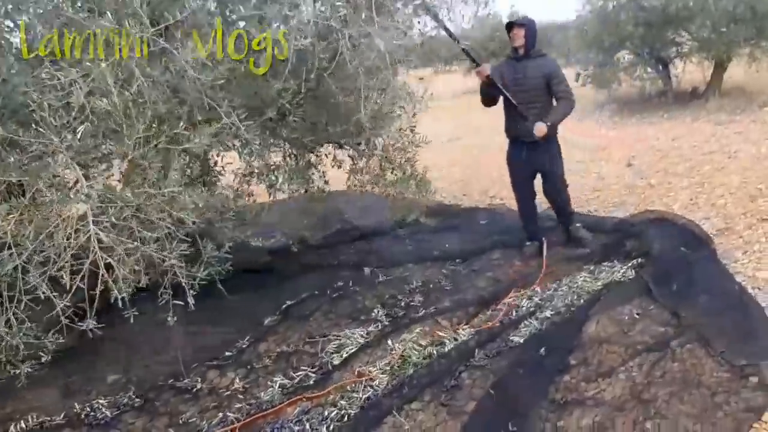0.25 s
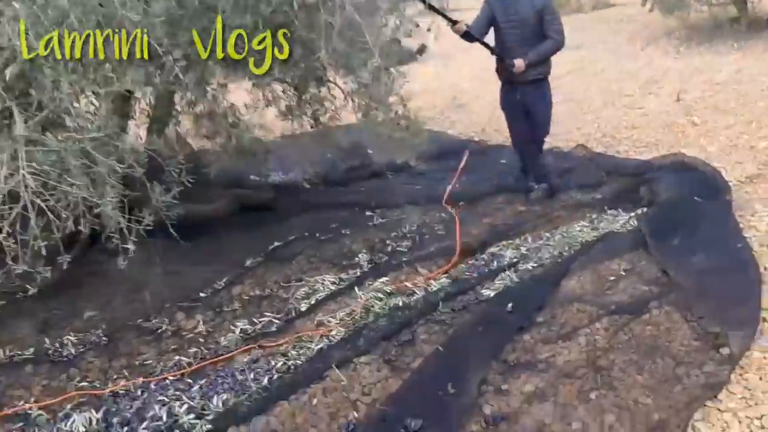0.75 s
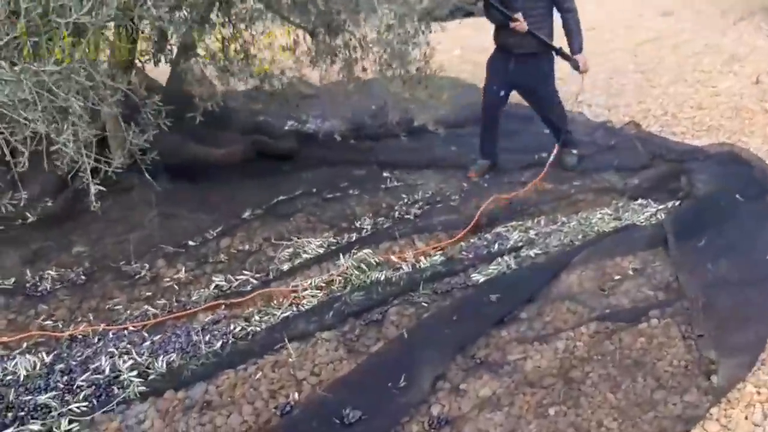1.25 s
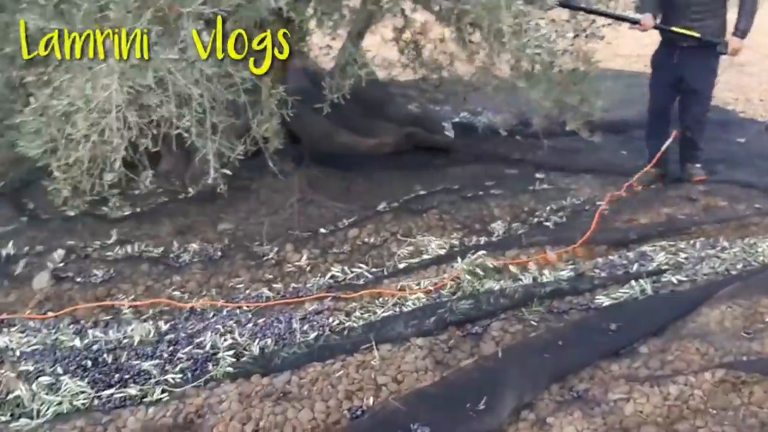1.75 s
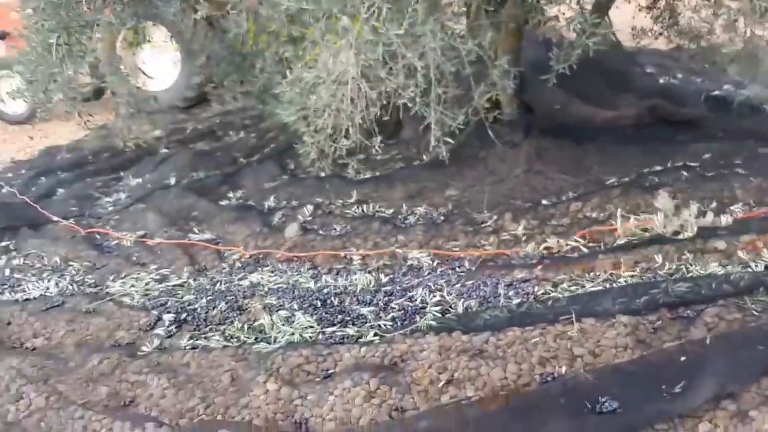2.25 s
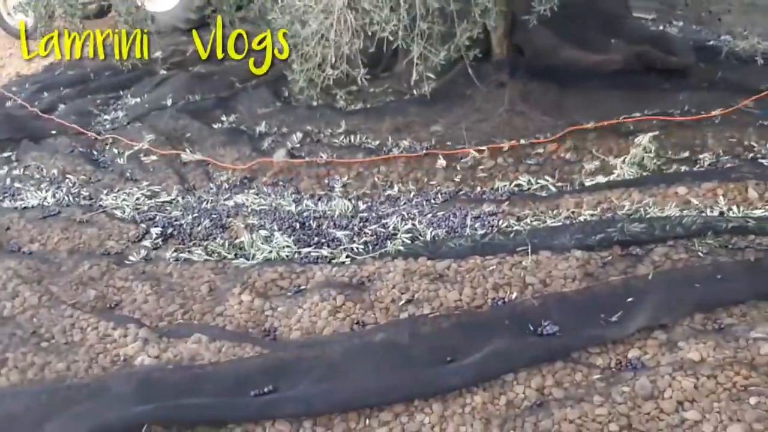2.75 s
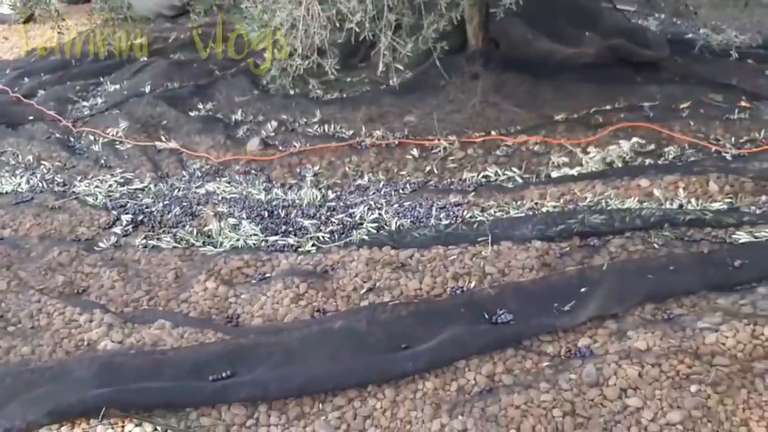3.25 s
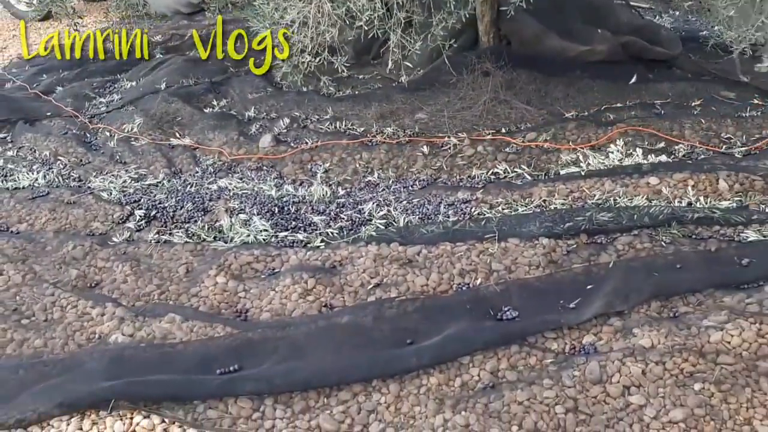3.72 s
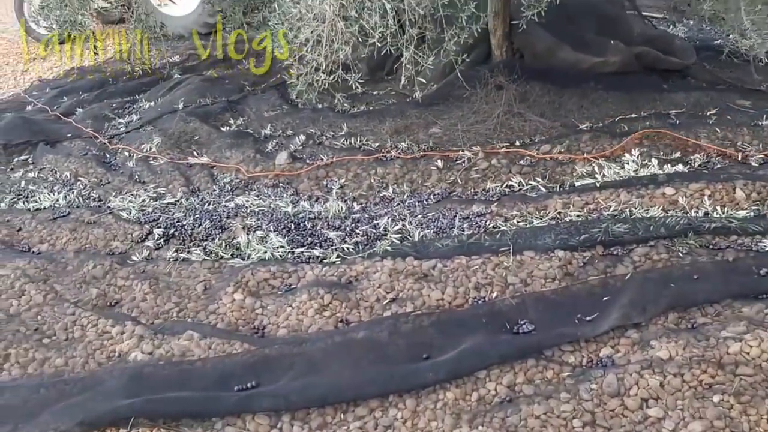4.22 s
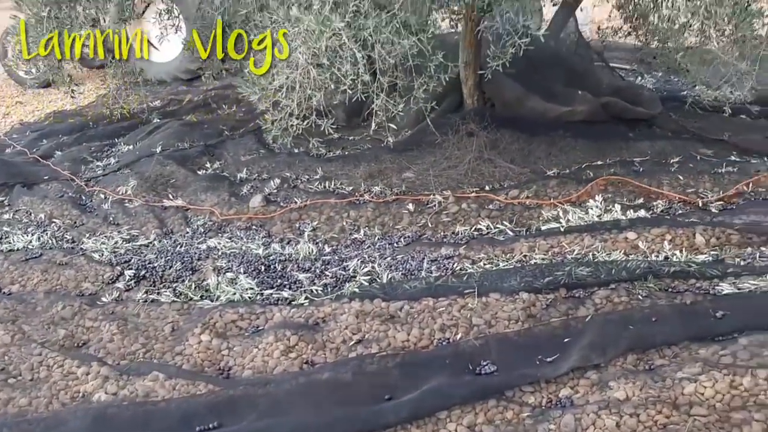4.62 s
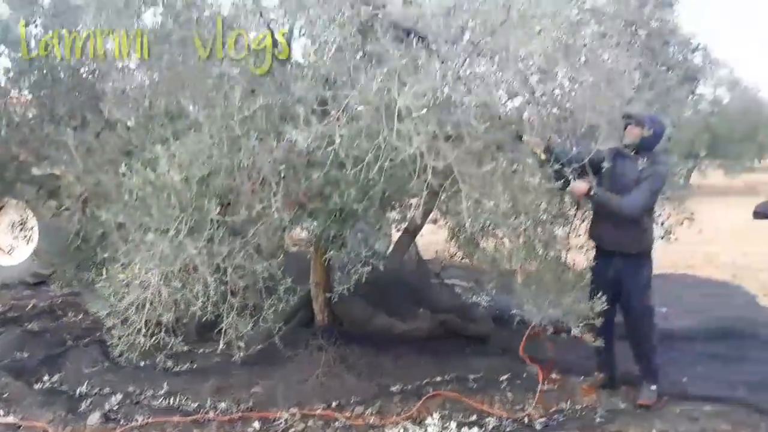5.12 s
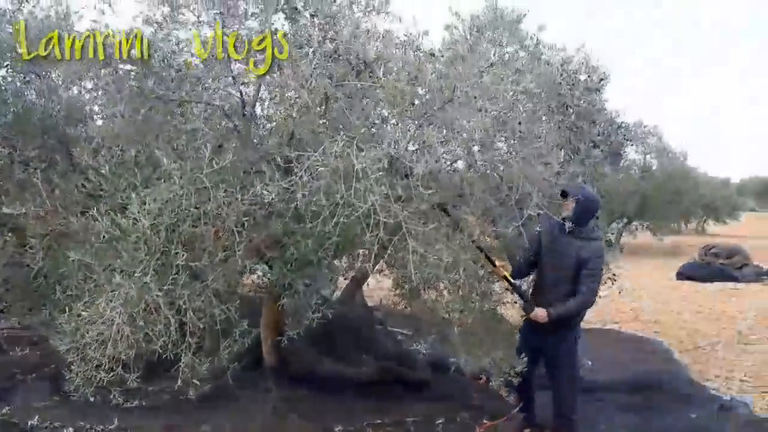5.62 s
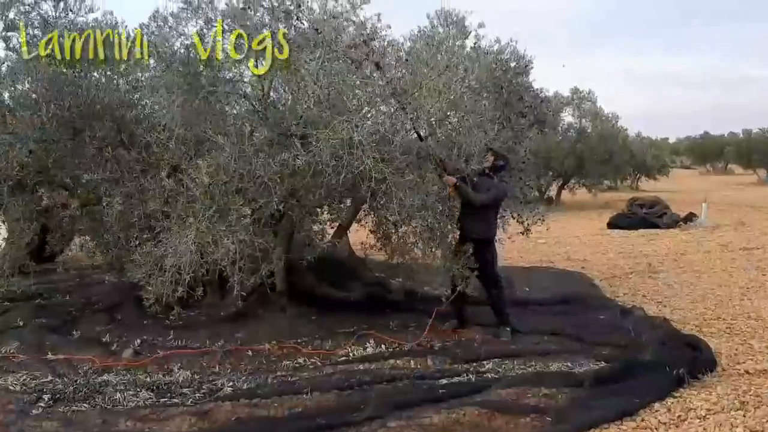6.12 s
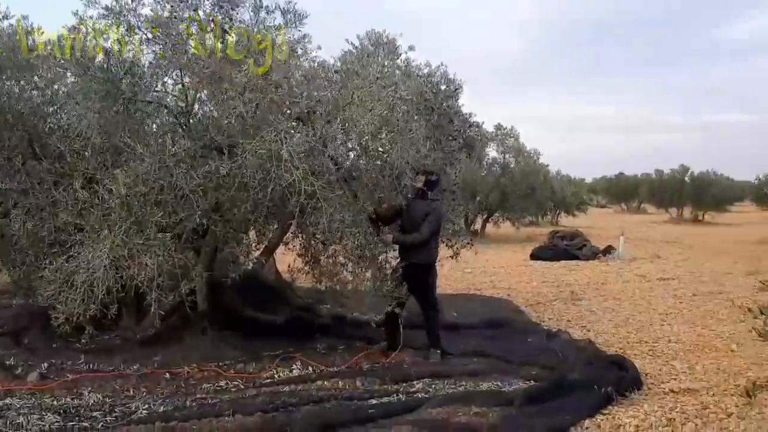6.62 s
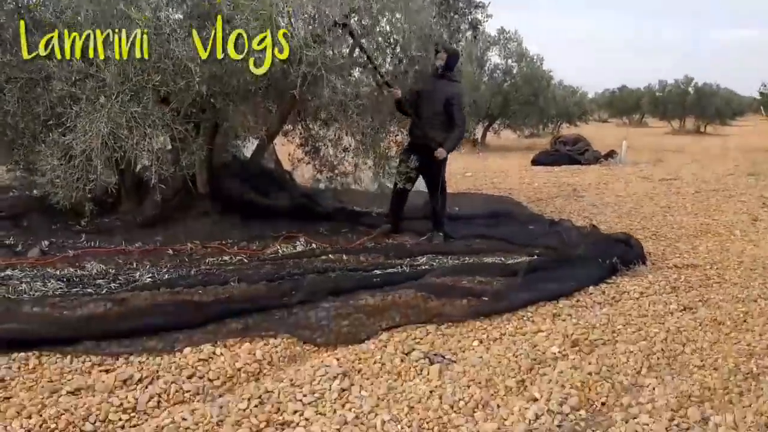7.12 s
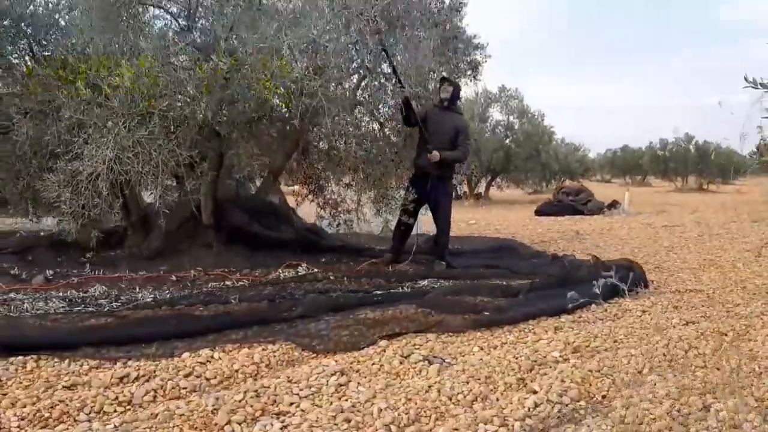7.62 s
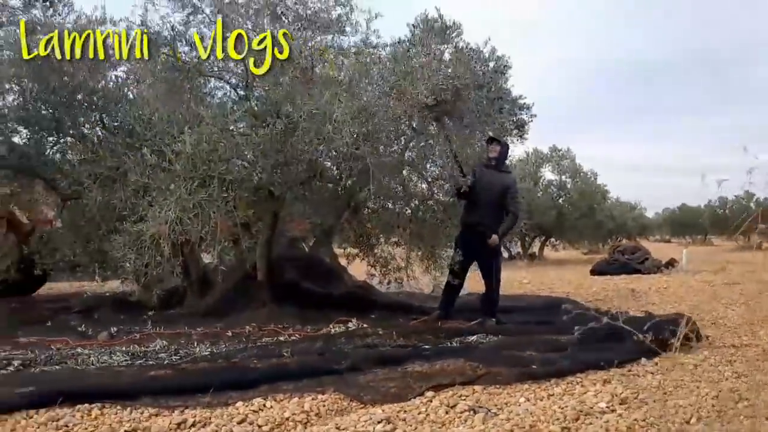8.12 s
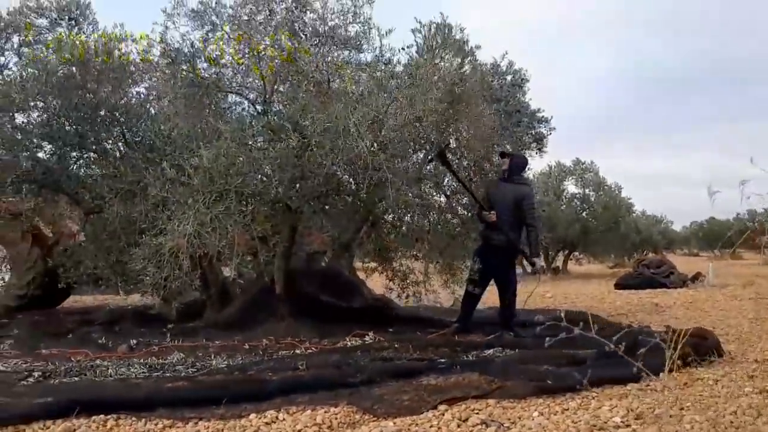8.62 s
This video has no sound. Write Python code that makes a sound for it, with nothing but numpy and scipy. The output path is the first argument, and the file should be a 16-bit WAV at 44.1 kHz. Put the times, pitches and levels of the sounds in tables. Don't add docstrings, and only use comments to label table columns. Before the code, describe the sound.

Outdoors in an open orchard, close handheld phone pickup: steady fast knocking of a motorized harvesting rake, high gear whine bending under load, leaf hiss surging with each pass. Plastic tines clack, tick and slide off twigs, strongest near two seconds. Low wind thumps cover the end of the first section; after a momentary fade the same rattle and rustle continue more quietly at a distance.

```python
import sys
import numpy as np
from scipy import signal
from scipy.io import wavfile
from scipy.ndimage import uniform_filter1d, map_coordinates

SR = 44100
rng = np.random.default_rng(int(sys.argv[2]) if len(sys.argv) > 2 else 0)


def volts_from_decibels(level):
    exponent = np.asarray(level, float) / 20
    return 10 ** exponent


def wav_out(sig):
    wavfile.write(sys.argv[1], SR, np.round(np.clip(np.atleast_2d(sig).T, -1, 1) * 32767).astype(np.int16))


N = 390726
TIME = np.arange(N) / SR
COARSE = TIME[::64]

# (time [s], gear head level [dB], open-view brightness [dB], gear mesh level [dB])
RAKE = [(0, -48, 0, -64), (.67, -48.5, 4.5, -62), (1.08, -46.5, -0.5, -79), (2.04, -44.5, 3, -49),
        (2.6, -50, 3, -57), (2.94, -52, 0, -62.5), (3.5, -47.5, 3.5, -51), (4.13, -45.5, 0.5, -60.5),
        (4.54, -45, -2.5, -49.5), (4.82, -45.5, 1.5, -49.5), (5.2, -45.5, 7, -53), (5.56, -48, 0, -55.5),
        (5.9, -46, -1.5, -46.5), (5.93, -62, -3, -69), (6.48, -52.5, 1.5, -69), (7.2, -57, 1, -70.5),
        (7.92, -55, 2, -89), (8.5, -58.5, 3, -63)]
# (time [s], speed [strokes/s])
SPEED = [(0, 33.34), (.8, 34.58), (1.2, 33.35), (1.8, 29.32), (2.4, 32.73), (3.0, 33.73), (3.6, 31.45),
         (4.0, 34.01), (4.8, 32.45), (5.4, 34.5), (6.2, 32.8), (6.4, 30.15), (6.6, 32.2), (7.0, 33.74),
         (7.8, 31.85), (8.0, 30.2), (8.2, 33.23)]
FIRST_STROKE = -.4
# (place [strokes], level [dB])
SWING = [
    (0.199, -5.5),
    (0.417, -8),
    (0.866, 0.5),
    (1.202, -11),
    (1.465, -6.5),
    (1.901, 0),
]
# (frequency [Hz], density [dB per Hz])
HOUSING = [(250, -38), (450, -9.5), (600, -12), (800, -4.5), (1200, -0.5), (1900, -4.5), (2400, -0.5),
           (3300, -5.5), (4500, -5), (6500, -15), (8000, -24.5), (16000, -66.5)]
CRANK_DB, CRANK_T60 = -5, .012
# (share of mesh frequency [ratio], width [Hz], level over the gear head [dB])
MOTOR = [(.131, 28, -18.5), (.265, 40, -13.5), (.53, 150, -16)]
# (deepest time [s], half length [s], sag [Hz])
LOADS = [(0.8, 0.36, 355.3), (1.155, .3, 102), (2.048, 0.35, 495.6), (2.422, 0.24, 478.3),
         (2.841, 0.2, 80.2), (3.0, 0.92, 80.2), (3.085, 0.21, 89.5), (3.501, 0.14, 120.5),
         (3.746, 0.31, 482), (4.107, 0.29, 60.65), (5.101, .3, 399.4), (5.379, 0.25, 422),
         (5.773, 0.27, 44.2), (6.559, 0.51, 382.4), (7.292, 0.41, 49.73), (8.041, 0.61, 442.7),
         (8.699, .5, 261)]
FREE_HZ = 4606
MESH_LOSS_DB_PER_KHZ = 20
WOBBLE, JITTER, FLUTTER_DB = .0065, .004, 3.2
# (peak time [s], rise [s], fall [s], leaf level [dB], limb level [dB])
PASSES = [(.03, 0.12, 0.33, -46, -65), (.39, 0.037, 0.12, -37, -46.5), (1.08, 0.75, 0.32, -38, -49),
          (1.62, 0.15, 1, -36, -49.5), (2.04, 0.23, 0.35, -36.5, -53), (2.499, 0.33, 0.12, -59, -61),
          (2.86, 0.18, 0.27, -41.5, -57.5), (3.2, 0.94, 0.37, -60, -86), (3.66, 0.66, 1, -39.5, -54),
          (4.54, 0.24, 0.56, -51, -61), (5.0, 0.95, 0.17, -44.5, -60), (5.35, 0.63, 0.66, -44, -54.5),
          (5.849, 0.11, .05, -50, -60), (6.48, 0.48, 0.5, -49, -64), (6.85, 0.74, 0.25, -48.5, -70),
          (7.6, 0.24, .05, -81, -67), (7.92, 0.55, 0.71, -48, -56.5), (8.55, 0.72, 1, -51.5, -63.5),
          (8.87, 0.055, 0.066, -39, -86)]
PASS_DROP_DB, LIMB_DROP_DB = 14.5, 19
LEAF_REST_DB, LIMB_REST_DB, FIZZ_DB = -5, -25, -9
FIZZ_SHARE = 0.8
# (frequency [Hz], density [dB per Hz])
LEAVES = [(800, -27), (2000, -12.5), (3700, 0), (5000, -4), (6000, 2), (6900, -5.5), (8000, -20.5),
          (10000, -29.5)]
# (frequency [Hz], density [dB per Hz])
FIZZ = [(6500, -24.5), (8200, -2.5), (10000, 3.5), (12500, 4.5), (15300, 3), (16500, -1)]
# (frequency [Hz], density [dB per Hz])
LIMBS = [(120, -22.5), (230, -14.5), (350, 1.5), (520, 2), (800, -5.5), (1500, -41)]
# (time [s], peak [dB], top band over the peak [dB])
CLACKS = [(0.818, -20, -11.5), (0.9573, -18.5, -15), (1.076, -21, -10), (1.0958, -15, -25),
          (1.132, -19.5, -11), (1.1945, -17, -10), (1.3449, -25, -23), (1.9235, -22, -12),
          (1.991, -12, -21), (2.0332, -8.5, 2.5), (2.072, -13, -21), (2.0971, -12, -6), (2.1015, -15, -18),
          (2.1316, -8.5, -11.5), (2.1364, -16, -22), (3.5505, -26, -7), (3.628, -21, -12),
          (3.84, -19.5, -9), (6.5253, -21, -10.5), (6.813, -27, -4.5), (7.8565, -20.5, -10)]
CLACK_HZ, CLACK_T60 = 5890, 0.038
# (time [s], peak [dB], ring [Hz])
TWIGS = [(0.101, -29, 2980), (0.160, -26, 3970), (0.2469, -24.5, 3700), (0.2736, -27, 2550),
         (0.5125, -22.5, 4570), (0.6594, -26, 4030), (0.73, -26.5, 4570), (1.4925, -26.5, 3430),
         (1.55, -21.5, 3520), (1.61, -19, 2540), (2.164, -23, 4050), (2.372, -22.5, 3810),
         (3.3105, -23, 3540), (3.93, -28, 4167), (4.0527, -25, 3540), (4.1686, -29, 3770),
         (4.229, -30, 4420), (4.609, -23, 4740), (5.3028, -16, 3140), (5.3681, -12.5, 3646),
         (5.69, -32, 4050), (5.806, -30, 4285), (6.4874, -33, 2778), (6.9126, -26, 4360),
         (7.804, -27, 3740), (7.9841, -26.5, 3620)]
TWIG_TOP_DB, TWIG_T60 = -19.5, 0.056
# (time [s], peak [dB], ring [Hz])
TICKS = [(0.0403, -35, 2530), (0.1884, -25, 5100), (0.2179, -22, 3090), (0.2364, -20, 3720),
         (0.3047, -30, 4600), (0.3341, -31, 2770), (0.4514, -37, 4610), (0.7854, -24, 4220),
         (0.9423, -26, 4460), (1.0241, -14, 5250), (1.3139, -26, 3000), (1.3763, -28, 3160),
         (1.724, -13, 4460), (2.0584, -21, 5890), (2.587, -33, 3410), (2.6509, -28, 3170),
         (2.7117, -26.5, 3800), (3.0135, -42, 4530), (3.0784, -27, 4090), (3.1343, -37, 4400),
         (3.1936, -34, 4480), (3.3812, -19, 3780), (3.4326, -27, 4400), (3.4625, -33, 3610),
         (3.5773, -25, 4550), (3.9918, -22.5, 4100), (4.1101, -23, 3980), (4.14, -28.5, 3360),
         (4.4653, -29, 4460), (4.5211, -28, 4700), (5.2759, -21.5, 2800), (5.6314, -39, 4550),
         (6.0057, -45, 4490), (6.0362, -51, 4590), (6.0955, -34, 2990), (6.1539, -37, 3020),
         (6.2108, -29, 3530), (6.3026, -24.5, 2850), (6.3669, -35, 3960), (6.4338, -29, 2500),
         (6.6934, -28, 3700), (6.7441, -29, 6470), (6.8523, -21, 4020), (6.998, -31, 4570),
         (7.1756, -39, 4720), (7.3347, -33, 3040), (7.6525, -46, 4460), (7.7348, -31, 5820),
         (7.888, -31, 5400), (7.9264, -42, 5300), (7.9538, -30, 5340), (8.2157, -35, 5680),
         (8.2621, -29, 4200), (8.3115, -34, 3520), (8.3464, -31, 4390), (8.6453, -28, 4720),
         (8.737, -31, 5570), (8.7984, -28, 6000), (8.8448, -25.5, 6610)]
TICK_TOP_DB, TICK_T60 = -17.5, 0.024
# (time [s], peak [dB], ring [Hz], decay T60 [s])
SLIDES = [
    (.376, -20.5, 4800, 0.15),
    (0.482, -31, 4550, 0.15),
    (0.752, -25.5, 4330, 0.055),
    (1.953, -15.5, 5580, .13),
    (3.733, -20.5, 5550, 0.12),
    (8.05, -24.5, 3680, 0.11),
]
SLIDE_TOP_DB = -13.5
SNAP_T60 = .06
RING_DB, UNDERTONE, UNDERTONE_DB = 1, .635, -5
# (time [s], peak [dB], ring [Hz])
THUDS = [(0.376, -44, 222), (0.939, -34, 356), (1.08, -32, 476), (1.599, -56, 550), (1.949, -33.5, 540),
         (2.172, -33.5, 488), (2.409, -40, 397), (2.787, -45, 580), (3.385, -43, 585), (3.629, -52, 580),
         (3.833, -35.5, 483), (7.814, -48, 590)]
# (peak time [s], rise [s], fall [s], level [dB])
GUSTS = [(0, .1, 0.14, -43), (.39, 0.32, 0.13, -60), (.6, 0.21, 0.077, -50), (1.0, 1.2, .4, -62.5),
         (1.58, 0.11, .6, -64), (2.21, 0.062, 0.13, -58), (2.47, 0.11, 0.11, -62), (2.82, .12, 0.084, -66),
         (3.76, .85, .38, -75), (5.0, 0.13, 0.26, -56), (5.2, 0.11, 0.2, -37), (5.48, 0.036, 0.056, -34),
         (5.63, 0.34, 0.31, -41), (5.8, 0.14, 0.19, -35), (6.11, 0.057, 0.026, -58),
         (6.98, 0.095, 0.2, -56), (7.35, 0.049, 0.037, -54), (7.61, 0.15, 0.31, -57), (8.3, 2, 0.88, -63.5),
         (8.61, 0.18, 0.23, -51.5), (8.83, 0.091, 0.028, -58), (4.9, 1.3, 0.21, -65)]
GUST_DROP_DB, CALM_DB = 23.5, -83.5
# (frequency [Hz], density [dB per Hz])
GUST = [(15, -34), (25, -82), (65, 0), (141, -1.5), (257, -8.5), (308, -16.5), (395, -13.5), (430, -18),
        (700, -45), (910, -37), (1540, -120)]
PORT_WIND_DB = [
    [0],
    [2],
]
# (time [s], peak [dB], frequency [Hz], left minus right [dB])
PUFFS = [(0.589, -43, 152.4, 0), (4.993, -45, 104, -14), (5.2, -39, 230, 2), (5.467, -31, 144, 13),
         (5.55, -34.5, 143.7, -3), (5.679, -40, 87, -6), (5.787, -40, 121.6, -1.5), (5.849, -36.5, 252, -3),
         (6.971, -61, 91.2, -5), (7.335, -55.5, 131, 5), (7.613, -49, 142, 11)]
# (time [s], delay [ms])
GROUND = [(0, 1.64), (1.3, 1.7), (3.3, 1.81), (4.2, 1.73), (5, 1.89), (5.5, 2.1), (5.9, 2.07), (5.95, 3.5),
          (6.2, 4.24), (6.8, 2.85), (7.4, 1.97), (7.6, 1.77), (8, 1.57), (8.6, 1.83)]
NET_MS, NET_DB, SOIL_DB = 1.29, -18, -13.5
# (time [s], delay [ms])
LATE = [(0.1, 0.051), (1.1, -0.0071), (1.9, 0.12), (2.3, 0.28), (3.7, 0.17), (4.1, 0.26), (4.7, 0.17),
        (5.1, -0.049), (6.1, -0.048), (6.7, -0.11), (7.1, -0.052), (8.7, 0.043)]
# (frequency [Hz], share [ratio])
DIRECT = [(200, .92), (500, .97), (1300, .84), (3000, .66), (5500, .55), (9000, .3), (14000, .25)]
# (frequency [Hz], left minus right [dB])
TILT = [(60, 11), (180, 0.5), (550, -1.5), (1650, 1.5), (4970, -2.5), (15000, 1)]
EDGE_HZ = 15550
CUT_S, FADE_OUT_S, FADE_IN_S, FADE_POWER = 5.917, .05, .062, 2.5
SILENT_S = .006


def stroke_count():
    s, per_s = np.transpose(SPEED)
    speed = per_s[np.searchsorted(s, TIME, "right") - 1]
    return FIRST_STROKE + np.cumsum(speed) / SR


def knocks(loose=.03, spread_db=1.6):
    count, train = stroke_count(), np.zeros(N)
    swings = np.arange(0, count[-1] - 2, 2)
    for place, db in SWING:
        chance = rng.standard_normal((len(swings), 2))
        at = np.searchsorted(count, swings + place + loose * chance[:, 0])
        train[np.clip(at, 0, N - 1)] += volts_from_decibels(db + spread_db * chance[:, 1])
    return train


def gear_head(train):
    grind = grains(1500, 1.0, 0.0042)
    drive = evened(bursts(train, 0.069)) + volts_from_decibels(-1.0) * grind
    return volts_from_decibels(gear_head_db() + 3.0 + 0.21 * slow(4.5)) * colour(drive, HOUSING)


def crank(train):
    click = evened(band(bursts(train ** 2, CRANK_T60), 1500, 5500))
    return volts_from_decibels(gear_head_db() + CRANK_DB + 1.64 * slow(2.25)) * click


def mesh_hz():
    s, half, sag = np.transpose(LOADS)[:, :, None]
    dips = sag * np.cos(np.pi / 2 * np.clip((COARSE - s) / half, -1, 1)) ** 2
    return FREE_HZ - np.interp(TIME, COARSE, dips.sum(axis=0))


def whine():
    mesh = mesh_hz()
    wobble = WOBBLE * np.sin(2 * np.pi * stroke_count())
    hz = mesh * (1 + wobble + JITTER * slow(62.4) + .002 * slow(5.86))
    db = curve(RAKE, column=3) - MESH_LOSS_DB_PER_KHZ * (FREE_HZ - mesh) / 1000
    return volts_from_decibels(db + 9.5 + FLUTTER_DB * slow(44)) * np.sin(2 * np.pi * np.cumsum(hz) / SR)


def motor():
    turns = np.cumsum(mesh_hz()) / SR
    total = np.zeros(N)
    for share, width_hz, db in MOTOR:
        rough = slow(width_hz / 2) + 1j * slow(width_hz / 2)
        total += (volts_from_decibels(db) * rough * np.exp(2j * np.pi * share * turns)).real
    return volts_from_decibels(gear_head_db()) * total


def strikes():
    view = curve(RAKE, column=2)
    clacks = [(s, db, CLACK_HZ, top, CLACK_T60) for s, db, top in CLACKS]
    twigs = [(s, db, hz, TWIG_TOP_DB + 1.97 * view[round(s * SR)], TWIG_T60) for s, db, hz in TWIGS]
    ticks = [(s, db, hz, TICK_TOP_DB, TICK_T60) for s, db, hz in TICKS]
    slides = [(s, db, hz, SLIDE_TOP_DB, t60) for s, db, hz, t60 in SLIDES]
    return clacks + twigs + ticks + slides


def cracks():
    out, t = np.zeros((2, N)), np.arange(4000) / SR
    attack = np.minimum(t / 0.00075, 1)
    for s, db, hz, top_db, t60 in strikes():
        z = rng.standard_normal((3, len(t)))
        sharp = min(SNAP_T60 / t60, 1) ** 2
        turns = 2 * np.pi * hz * t
        body = evened(band(z, hz / 1.126, hz * 1.137))
        body = body + 2.04 * evened(band(z, 2920, 7230)) + 0.61 * evened(band(z, 970, 1520))
        body = body + volts_from_decibels(RING_DB) * sharp * np.sin(turns)
        if hz == CLACK_HZ:
            body = body + volts_from_decibels(UNDERTONE_DB) * np.sin(UNDERTONE * turns)
        sound = body + volts_from_decibels(min(top_db, -7) + 14.5) * evened(band(z, 7700, 13700))
        snap = volts_from_decibels(-3 - 60 * (t / 0.002) ** 2) * sound[0] * sharp
        tails = volts_from_decibels(-9.5 - 60 * t / np.clip(t60, .015, .3)) * (sound[0] + sound[1:])
        late = np.interp(s, *np.transpose(LATE)) / 2000
        for port, tail, side in zip(out, tails, (1, -1)):
            add(port, s + side * late, volts_from_decibels(db - 12 - 0.99 * side) * attack * (snap + tail))
    return out


def leaves(train):
    shaken = evened(bursts(train, 0.05))
    scrape = colour(volts_from_decibels(2) * shaken + grains(2500, 2.4, .004), LEAVES)
    fizz = colour(volts_from_decibels(-3) * shaken + grains(3000, 3.6, .005), FIZZ)
    flurry, head_db = slow(6.9), gear_head_db()
    stir_db = swells([row[:-1] for row in PASSES], PASS_DROP_DB, head_db + LEAF_REST_DB)
    fizz_db = FIZZ_SHARE * stir_db + (1 - FIZZ_SHARE) * head_db + FIZZ_DB + curve(RAKE, column=2)
    return volts_from_decibels(stir_db + 1.9 * flurry) * scrape + volts_from_decibels(fizz_db + 2 + 1.66 * flurry) * fizz


def limbs(train):
    drive = evened(bursts(train, 0.039)) + grains(300, 3, .02)
    shakes = [(s, rise, fall, db) for s, rise, fall, _, db in PASSES]
    level_db = swells(shakes, LIMB_DROP_DB, gear_head_db() + LIMB_REST_DB)
    return volts_from_decibels(level_db) * colour(drive, LIMBS)


def thuds():
    out = np.zeros(N)
    for s, db, hz in THUDS:
        add(out, s, ring(db, hz, 0.045, 0.0041))
    return out


def wind():
    lumps = [colour(rng.standard_normal(N), GUST) * volts_from_decibels(3.6 * slow(26.4)) for _ in range(2)]
    out = volts_from_decibels(swells(GUSTS, GUST_DROP_DB, CALM_DB) + PORT_WIND_DB) * evened(np.array(lumps))
    for s, db, hz, pan_db in PUFFS:
        add(out[0], s, -ring(db + 10 + pan_db / 2, hz, 0.026, 0.0045))
        add(out[1], s + .004, ring(db + 9 - pan_db / 2, 1.21 * hz, 0.053, 0.0051))
    return out


def ground(x):
    low = band(x, 300, 4500)
    soil_s = curve(GROUND, column=1) / 1000
    net_s = NET_MS * (1 + .04 * slow(.8)) / 1000
    soil = map_coordinates(low, [(TIME - soil_s) * SR], order=3)
    net = map_coordinates(low, [(TIME - net_s) * SR], order=3)
    return x + volts_from_decibels(SOIL_DB + 4.6 * slow(2.5)) * soil + volts_from_decibels(NET_DB + 5 * slow(1.44)) * net


def ports(x, t60=0.064):
    hz, s, z = signal.stft(x, SR, nperseg=256, noverlap=192)
    hold = np.exp(-2 * np.log(1000) * s[1] / t60)
    lingering = np.sqrt(signal.lfilter([1 - hold], [1, -hold], abs(z) ** 2, axis=1))
    hiss = signal.stft(rng.standard_normal((2, N)), SR, nperseg=256, noverlap=192)[2]
    scattered = lingering * evened(abs(hiss)) * np.exp(1j * np.angle(hiss))
    share = np.clip(read(DIRECT, hz), 0, 1)[:, None]
    late_s = np.interp(s, *np.transpose(LATE)) / 1000
    turn = np.exp(-1j * np.pi * np.outer(hz, late_s))
    straight = z * np.array([turn, 1 / turn])
    pair = np.sqrt(share) * straight + np.sqrt(1 - share) * scattered
    pair *= volts_from_decibels(np.multiply.outer([.5, -.5], read(TILT, hz)))[:, :, None]
    return signal.istft(pair, SR, nperseg=256, noverlap=192)[1][:, :N]


def thrifty(x, mask_db=-12.5, fickle_db=4.5):
    hz, s, z = signal.stft([x[0] + x[1], x[0] - x[1]], SR, nperseg=1024, noverlap=512)
    power, low_hz = abs(z) ** 2, hz[:512, None]
    narrow = power[:, :512].reshape(2, 64, 8, -1).mean(2)
    whim = evened(uniform_filter1d(rng.standard_normal(narrow.shape), size=3, axis=2))
    narrow = np.repeat(narrow * volts_from_decibels(2 * fickle_db * whim), 8, axis=1)
    both = power.mean(0)[:512]
    near = uniform_filter1d(both, size=50, axis=0)
    far = uniform_filter1d(both, size=150, axis=0, origin=30)
    wide = np.where(low_hz < 3300, volts_from_decibels(4) * near, np.where(low_hz < 7000, .3, 1) * far)
    masked = (narrow < volts_from_decibels(2 * mask_db) * wide) & (low_hz > 1500)
    z[:, :512] *= np.where(masked, .003, 1)
    total, difference = signal.istft(z, SR, nperseg=1024, noverlap=512)[1][:, :N]
    return np.array([total + difference, total - difference]) / 2


def scene_change():
    away = np.where(TIME < CUT_S, (CUT_S - TIME) / FADE_OUT_S, (TIME - CUT_S) / FADE_IN_S)
    silent = SILENT_S / FADE_OUT_S
    return np.clip((away - silent) / (1 - silent), 0, 1) ** FADE_POWER


def evened(x):
    return x / np.sqrt(np.mean(x ** 2) + 1e-20)


def read(points, hz):
    f, value = np.transpose(points)
    return np.interp(np.log(hz + 1), np.log(f + 1), value)


def curve(rows, column):
    rows = np.vstack(rows)
    return np.interp(TIME, rows[:, 0], rows[:, column])


def gear_head_db():
    return curve(RAKE, column=1)


def add(mix, s, sound):
    part = mix[round(s * SR):][:len(sound)]
    part += sound[:len(part)]


def colour(x, points):
    log_gain = np.log(volts_from_decibels(read(points, abs(np.fft.fftfreq(4096, 1 / SR)))))
    minimum_phase = np.exp(np.conj(signal.hilbert(log_gain)))
    taps = np.fft.ifft(minimum_phase).real[:2048]
    return evened(signal.oaconvolve(x, taps)[:N])


def band(x, lo_hz, hi_hz):
    sos = signal.butter(2, [lo_hz, min(hi_hz, SR / 2.1)], "band", fs=SR, output="sos")
    return signal.sosfilt(sos, x)


def slow(hz):
    sos = signal.butter(2, hz, fs=SR, output="sos")
    return evened(signal.sosfilt(sos, rng.standard_normal(N)))


def bursts(clicks, t60):
    decay = np.exp(-np.log(1000) / (t60 * SR))
    return signal.lfilter([1], [1, -decay], clicks) * rng.standard_normal(N)


def grains(per_s, spread_db, t60):
    size = volts_from_decibels(spread_db * np.minimum(rng.exponential(1, N), 5))
    return evened(bursts(size * (rng.random(N) < per_s / SR), t60))


def ring(db, hz, t60, rise):
    t = np.arange(6000) / SR
    return volts_from_decibels(db - 60 * t / t60) * np.minimum(t / rise, 1) * np.sin(2 * np.pi * hz * t)


def swells(rows, drop_db, rest_db):
    s, rise, fall, db = np.transpose(rows)[:, :, None]
    away = np.where(COARSE < s, (s - COARSE) / rise, (COARSE - s) / fall)
    power = np.interp(TIME, COARSE, volts_from_decibels(2 * (db - drop_db * away)).sum(axis=0))
    return 10 * np.log10(power + volts_from_decibels(2 * rest_db))


def scene():
    train = knocks()
    machine = gear_head(train) + crank(train) + motor() + whine()
    tree = leaves(train) + limbs(train) + thuds()
    return ports(ground(machine + tree)) * volts_from_decibels(-0.08) + cracks() + wind()


def band_limit(x):
    return signal.sosfilt(signal.butter(12, 16660, fs=SR, output="sos"), x)


def record(dry):
    limited = signal.oaconvolve(dry, signal.firwin(255, EDGE_HZ, fs=SR)[None], "same")
    mix = thrifty(limited) * scene_change()
    return band_limit(mix)


dry = scene()
out = record(dry)
wav_out(out)
```